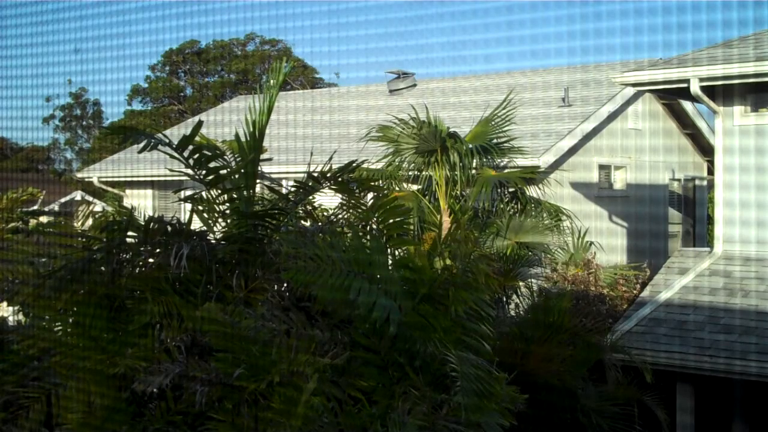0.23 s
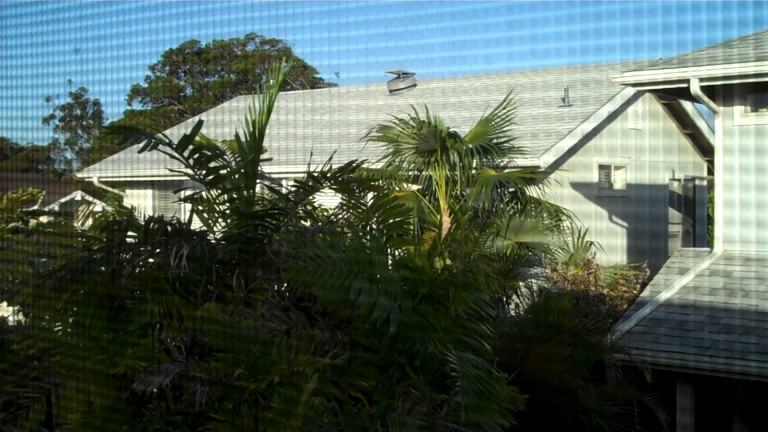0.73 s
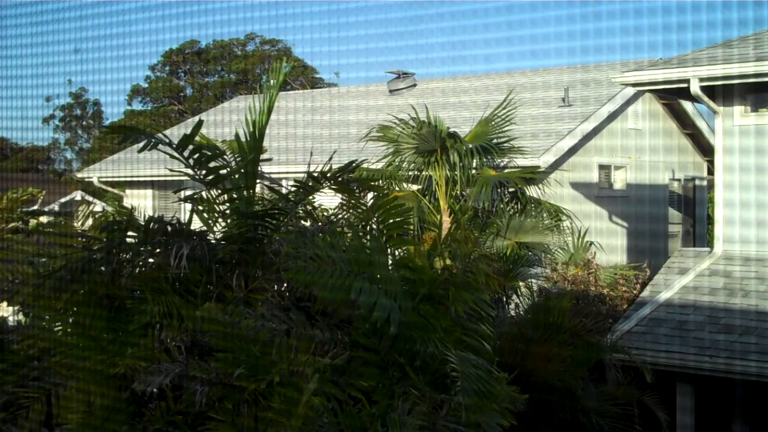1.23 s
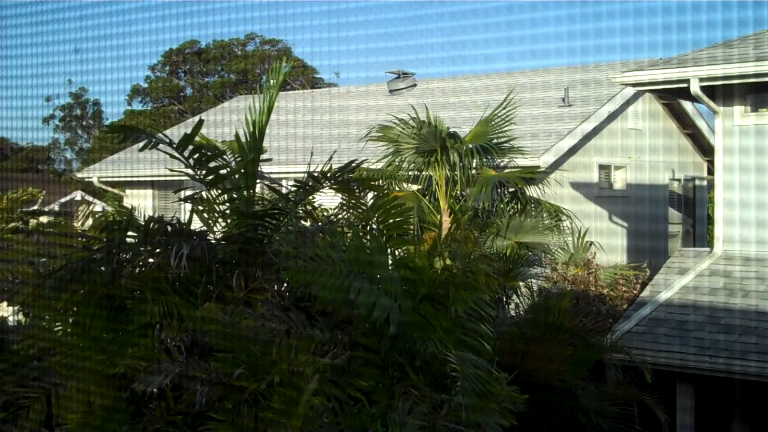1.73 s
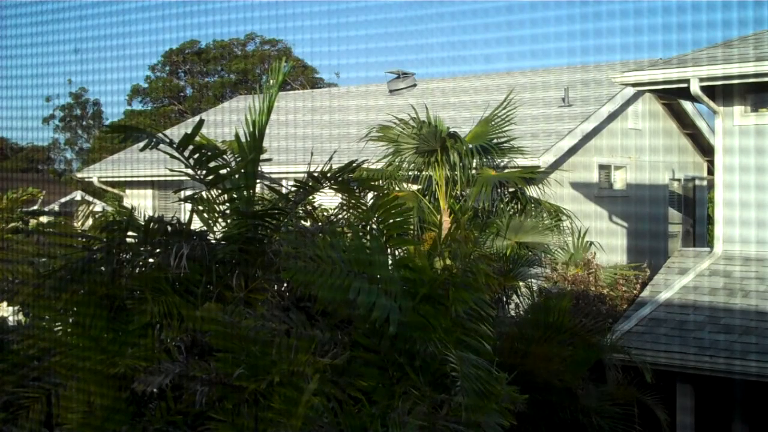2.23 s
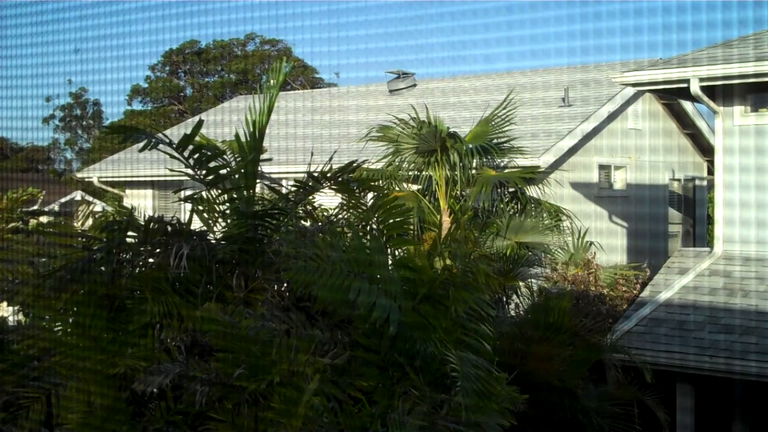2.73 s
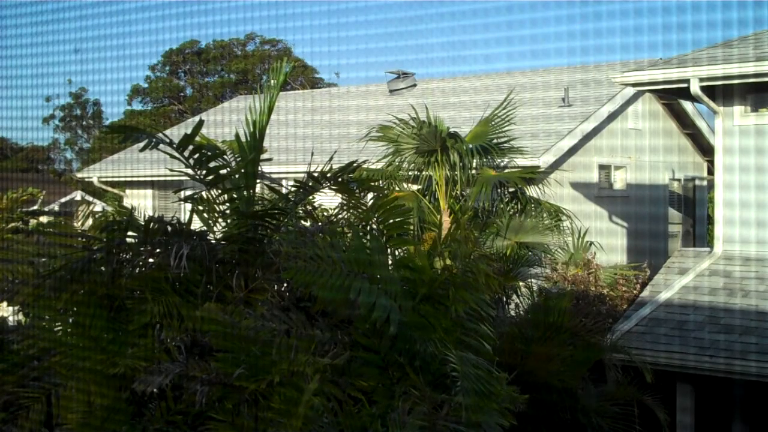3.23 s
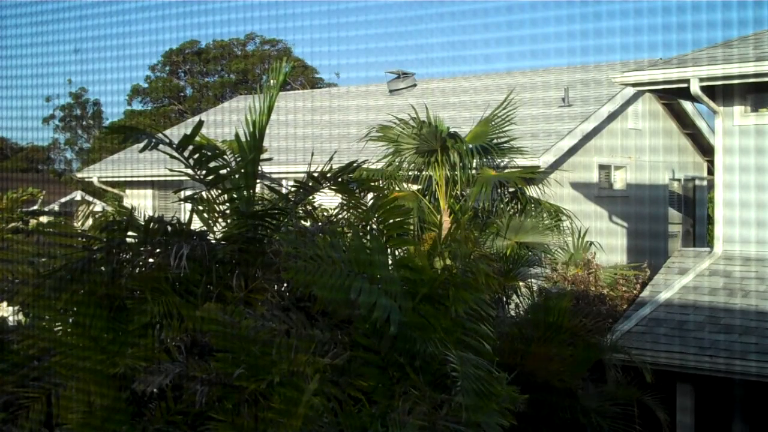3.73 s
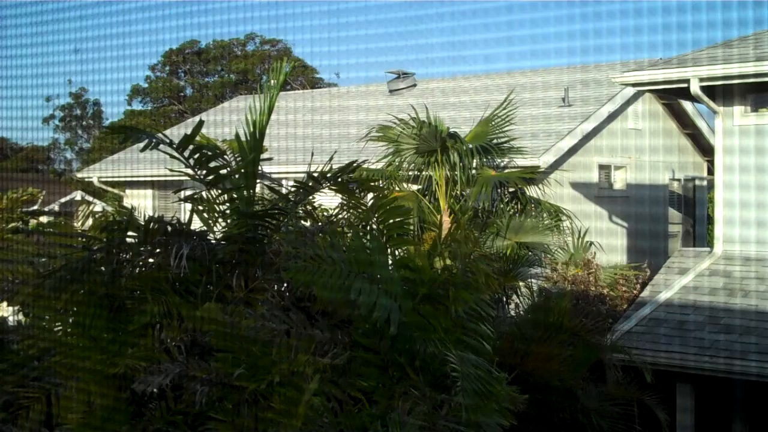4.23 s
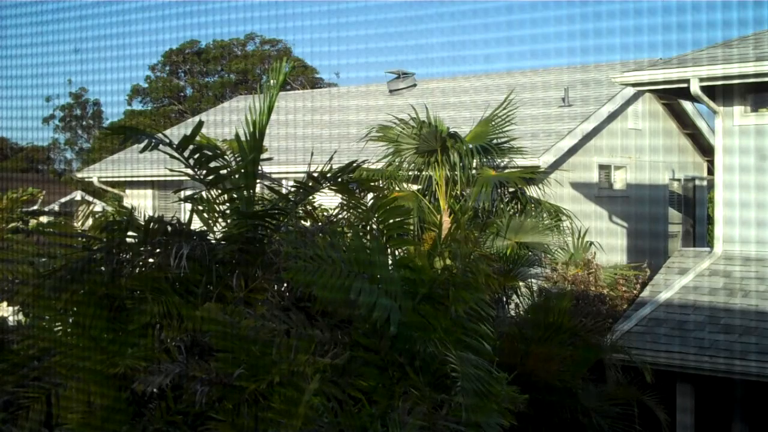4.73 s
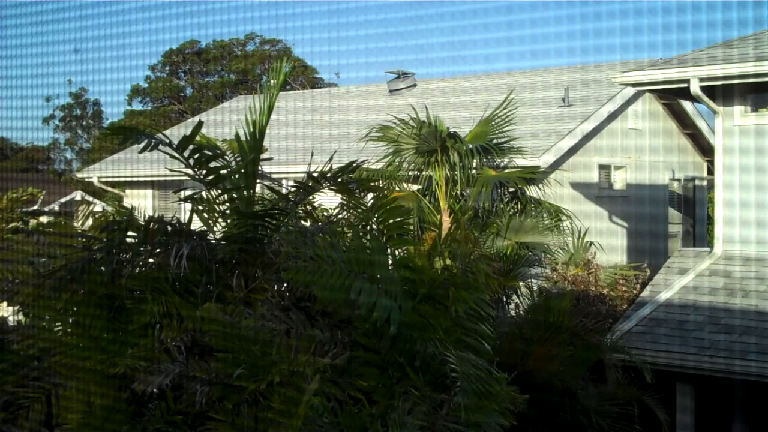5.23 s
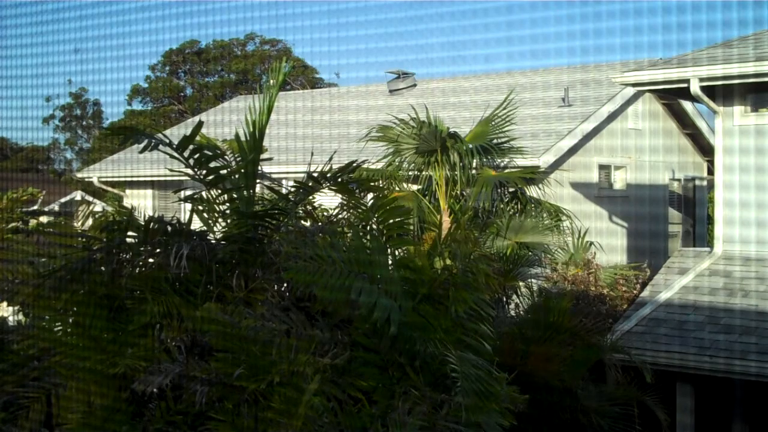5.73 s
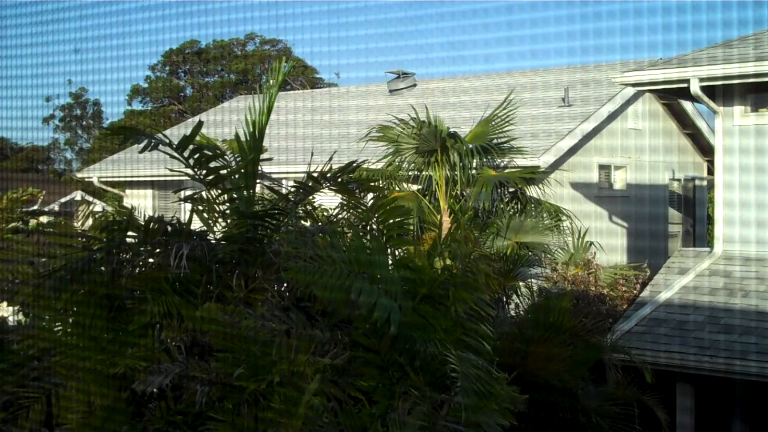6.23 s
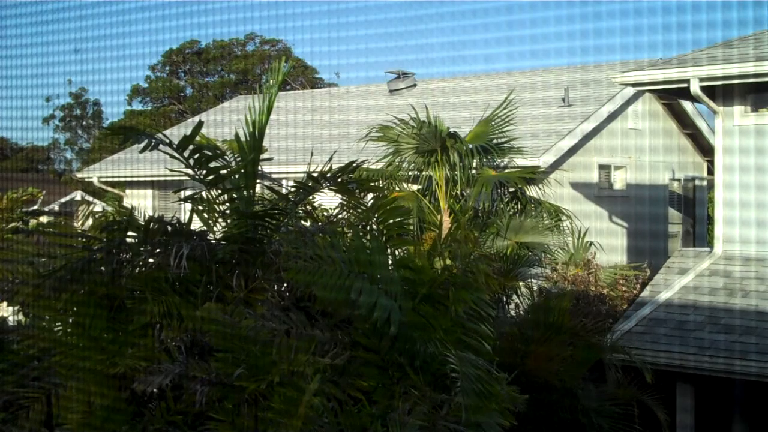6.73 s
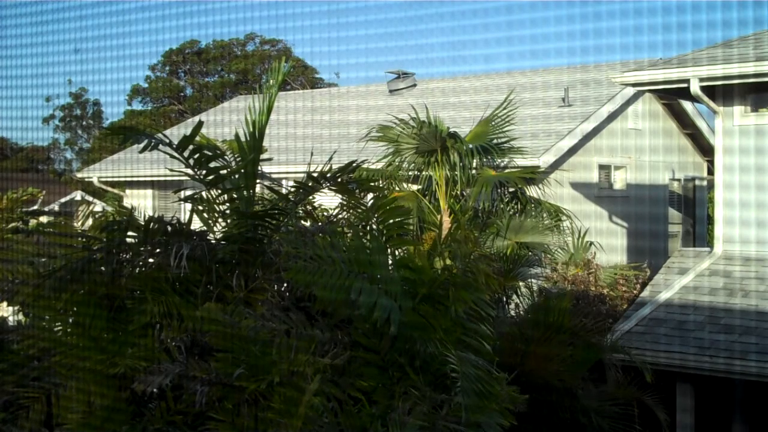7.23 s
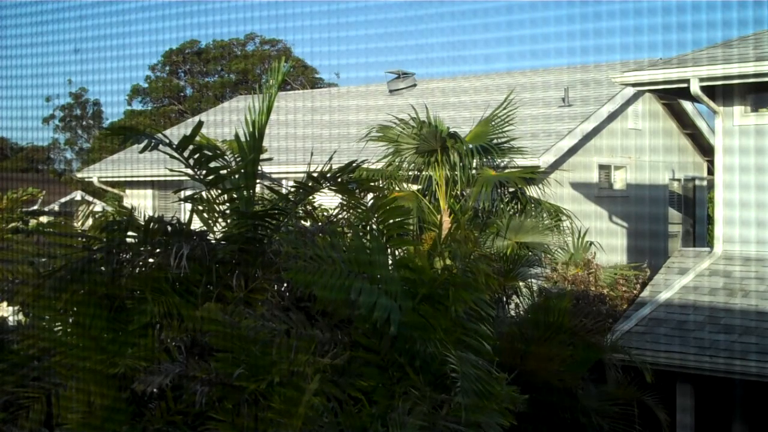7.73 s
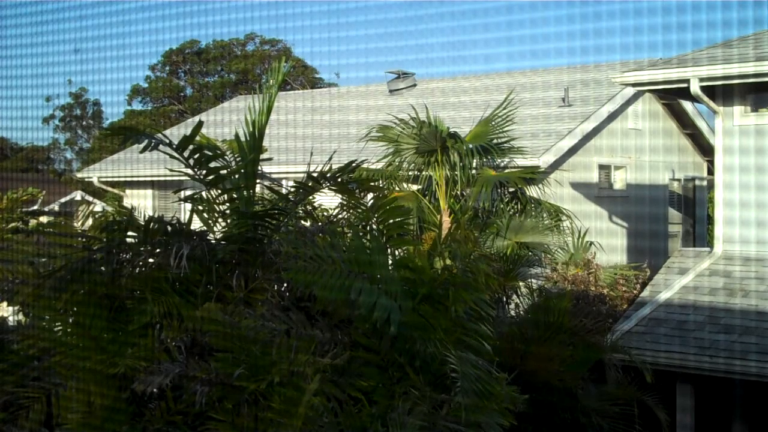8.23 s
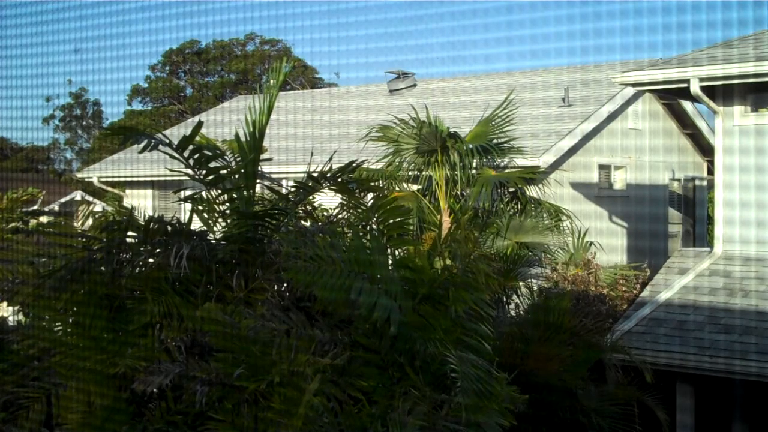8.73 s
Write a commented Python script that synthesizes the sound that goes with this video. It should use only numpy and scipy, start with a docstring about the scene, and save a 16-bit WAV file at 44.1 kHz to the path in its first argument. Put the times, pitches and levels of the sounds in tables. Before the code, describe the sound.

Faint bird chirps and a quiet spraying hiss in a neighborhood, broken by a single loud, echoing parrot squawk.

```python
"""Parrot squawk among houses.

A large parrot squawks once, its vibrating membranes rough when slack, smoother when taut; near walls
throw the call back and the yards ring on. Small birds whistle and far parrots rasp over a town hum
and a hiss like spraying water, which drops out for half a second and returns with a thin rising whine."""
import sys
import numpy as np
from scipy import signal
from scipy.fft import rfft, irfft
from scipy.io import wavfile
from scipy.ndimage import uniform_filter1d

SR = 44100
rng = np.random.default_rng(int(sys.argv[2]) if len(sys.argv) > 2 else 0)


def transcribe(u):
    """Save the signal u as a 16-bit wav file named by the first command-line argument.

    u: samples, shape (n,) or (channels, n), limited to [-1, 1]; the rate is SR.
    q: integer samples, one column per channel.
    """
    v = np.clip(np.atleast_2d(u).T, -1, 1)
    q = np.round(v * 32767).astype(np.int16)
    wavfile.write(sys.argv[1], SR, q)


N = 395577
TIME_S = np.arange(N) / SR
SIDE_LAG_S = .000135


def gain_of(db):
    """Decibels to amplitude factor."""
    return 10 ** (np.asarray(db) / 20)


def unit_rms(x):
    """Scales to rms 1."""
    return x / np.sqrt(np.mean(np.abs(x) ** 2) + 1e-20)


def at_hz(points, hz):
    """Interpolates on a log-frequency axis."""
    points_hz, values = np.transpose(points)
    return np.interp(np.log(hz + 1), np.log(points_hz + 1), values)


def follow(rows, t=TIME_S):
    """Interpolates each value column over time."""
    times_s, *columns = np.transpose(rows)
    return [np.interp(t, times_s, column) for column in columns]


def add(mix, start_s, sound):
    """Mixes a sound in at start_s."""
    part = mix[round(start_s * SR):][:len(sound)]
    part += sound[:len(part)]


def delay_left(x, lag_s):
    """Mono to stereo, left channel late."""
    return np.array([np.roll(x, round(lag_s * SR)), x])


def tilt(x, balance):
    """Splits a left-over-right spectrum between the channels."""
    left_db = at_hz(balance, np.fft.rfftfreq(N, 1 / SR))
    return irfft(rfft(x) * gain_of([[.5], [-.5]] * left_db), N)


def wobble(count, width_hz):
    """Complex low-pass noise, rms 1."""
    pole = np.exp(-np.pi * width_hz / SR)
    noise = rng.standard_normal(count + 4000) + 1j * rng.standard_normal(count + 4000)
    return unit_rms(signal.lfilter([1], [1, -2 * pole, pole * pole], noise)[-count:])


def noise_band(t, centre_hz, width_hz):
    """Narrow noise around a fixed pitch."""
    return (wobble(len(t), width_hz) * np.exp(2j * np.pi * centre_hz * t)).real


def stereo_noise(spectrum, coherence, lag_s, patch_db):
    """Coloured, partly coherent noise with drifting spectral patches."""
    frames, hz = N // 256 + 5, np.fft.rfftfreq(1024, 1 / SR)
    a, b, c, d, patches = rng.standard_normal((frames, 513, 5)).T
    patches = unit_rms(uniform_filter1d(uniform_filter1d(patches, size=12, axis=0), size=20, axis=1))
    shared = np.clip(coherence(hz), 0, 1)[:, None]
    delay = np.exp(-2j * np.pi * hz * lag_s)[:, None]
    right = a + 1j * b
    left = shared * delay * right + np.sqrt(1 - shared ** 2) * (c + 1j * d)
    spectra = np.array([left, right]) * gain_of(at_hz(spectrum, hz)[:, None] + patch_db * patches)
    return unit_rms(signal.istft(spectra, nperseg=1024, noverlap=768)[1][:, :N])


def fuzzy_tone(rows, width_hz):
    """Flickering narrow noise along rows of (time [s], pitch [Hz], level [dB])."""
    hz, db = follow(rows)
    gate = uniform_filter1d(1. * ((TIME_S > rows[0][0]) & (TIME_S < rows[-1][0])), size=1500)
    flicker = unit_rms(gain_of(3 * wobble(N, 12).real))
    carrier = np.exp(2j * np.pi * np.cumsum(hz) / SR)
    return gate * gain_of(db) * flicker * (wobble(N, width_hz) * carrier).real


def bird_note(length_s, path_hz, width_hz, steady, attack_share):
    """A tone bending through path_hz, part steady, part smeared over width_hz."""
    progress = np.linspace(0, 1, round(length_s * SR))
    curve = np.polyfit(np.linspace(0, 1, len(path_hz)), path_hz, len(path_hz) - 1)
    hz = np.polyval(curve, progress)
    envelope = np.minimum(progress / attack_share, 1) * np.sqrt(1 - progress)
    carrier = np.exp(2j * np.pi * np.cumsum(hz) / SR)
    return unit_rms(envelope * ((steady + wobble(len(hz), width_hz)) * carrier).real)


TRAFFIC_SPECTRUM = [(15, -46.5), (25, -14.5), (126, -5.5), (198, -9.5), (417, -4), (621, -4.5), (690, -6.5),
                    (788, -5.5), (949, -6), (1080, -8), (1800, -12), (3580, -12.5), (4800, -18),
                    (7330, -17), (14200, -22.5)]  # (frequency [Hz], relative density [dB])
TRAFFIC_LEVEL = [(0.0, -57), (2.33, -59), (3.3, -57.5), (5.16, -59), (6.84, -58.5), (8.97, -59)]  # (time [s], level [dB])
TRAFFIC_COHERENCE = [(50, .15), (130, .7), (280, .62), (620, .62), (1340, .45), (2920, .12), (6340, .03)]  # (frequency [Hz], left-right coherence [0-1])
# Far tones: (time [s], length [s], start pitch [Hz], end pitch [Hz], level [dB])
DRONE_TONES = [(0, 0.71, 1059, 1040, -63), (5.15, 1.2, 1190, 1032, -67), (6.55, 0.88, 1110, 1020, -67.5),
               (7.549, 0.8, 1160, 1108, -68)]


def town():
    """Far traffic, a low machine hum and faint sagging drones."""
    hum = gain_of(-73) * noise_band(TIME_S, centre_hz=121, width_hz=18)
    traffic = stereo_noise(TRAFFIC_SPECTRUM, lambda hz: at_hz(TRAFFIC_COHERENCE, hz),
                           lag_s=.00002, patch_db=.13)
    drones = sum(fuzzy_tone([(start_s, start_hz, db), (start_s + length_s, end_hz, db)], width_hz=77)
                 for start_s, length_s, start_hz, end_hz, db in DRONE_TONES)
    return gain_of(follow(TRAFFIC_LEVEL)[0]) * traffic + hum + drones


SPRAY_SPECTRUM = [(1470, -36), (2500, -14), (2650, -9.5), (3790, -12.5), (5330, -7.5), (5730, -8),
                  (5990, -7), (7450, -3), (9470, -16), (13500, -18.5), (14200, -24)]  # (frequency [Hz], relative density [dB])
SPRAY_LEVEL = [(0.0, -62), (0.17, -56), (2.0, -58), (2.62, -55.5), (4.4, -57.5), (6.9, -59), (7.6, -55),
               (8.97, -57.5)]  # (time [s], level [dB])


def spray():
    """A surging hiss from one side that drops while its valve is shut."""
    stop_s, restart_s, valve_s, shut_db = 1.363, 1.85, .03, -17
    surge_db, surges_per_s = 1.1, 2.93
    shut = follow([(stop_s - valve_s / 2, 0), (stop_s + valve_s / 2, 1),
                   (restart_s - valve_s / 2, 1), (restart_s + valve_s / 2, 0)])[0]
    surge = unit_rms(np.interp(TIME_S * surges_per_s, np.arange(60), rng.standard_normal(60)))
    gain = gain_of(follow(SPRAY_LEVEL)[0] + shut_db * shut + surge_db * surge)
    return gain * stereo_noise(SPRAY_SPECTRUM, lambda hz: np.full_like(hz, .45), SIDE_LAG_S, patch_db=.9)


def whine():
    """A thin tone that climbs and levels off after the spray restarts."""
    start_s, end_s, climb_s = 2.03, 3.14, .25
    start_hz, top_hz, level_db = 5100, 5400, -59.5
    rows = [(s, top_hz - (top_hz - start_hz) * np.exp(-(s - start_s) / climb_s), level_db)
            for s in np.linspace(start_s, end_s, 12)]
    return delay_left(fuzzy_tone(rows, width_hz=110), SIDE_LAG_S / 2)


FAR_RASPS = [(2.644, 0.04, 2080, -60), (3.184, 0.031, 3560, -69), (3.407, 0.045, 1600, -65),
             (3.408, 0.041, 2460, -62.5), (3.51, 0.053, 2220, -55.5), (6.803, 0.082, 2516, -63),
             (6.916, 0.092, 2800, -61.5), (7.361, .15, 3250, -69), (8.42, 0.066, 2634, -65.5)]  # (time [s], nominal length [s], pitch [Hz], relative level [dB])
FAR_CHIPS = [(1.288, 5400, -61.5), (1.977, 4780, -63), (4.61, 4900, -61.5), (5.548, 5030, -60.5),
             (6.433, 4870, -60.5), (7.427, 4400, -63), (8.366, 4820, -65.5)]  # (time [s], pitch [Hz], relative level [dB])


def far_birds():
    """Hoarse, barely pitched calls: sagging parrot rasps and one bird's short chips."""
    sag_share, spread_share, chip_spread_hz = .06, .13, 400
    out = np.zeros(N)
    for start_s, length_s, hz, db in FAR_RASPS:
        path_hz = [hz * (1 + sag_share), hz * (1 - sag_share)]
        rasp = bird_note(1.4 * length_s, path_hz, 2 * spread_share * hz, steady=.11, attack_share=.299)
        add(out, start_s, gain_of(db) * rasp)
    for start_s, hz, db in FAR_CHIPS:
        chip = bird_note(1.1 * .052, [hz, hz], 2 * chip_spread_hz, steady=.11, attack_share=.31)
        add(out, start_s, gain_of(db) * chip)
    return out


# Clear notes: (time [s], length [s], mid pitch [Hz], glide [Hz], level [dB])
BIRD_WHISTLES = [(0.51, 0.1, 3170, -110, -65), (0.623, 0.041, 2440, -130, -64.5),
                 (0.681, 0.09, 3300, 180, -63.5), (0.88, 0.058, 4500, 972, -61.5),
                 (1.23, 0.082, 3600, -750, -64), (1.498, 0.048, 4030, 120, -62.5),
                 (1.606, 0.035, 3620, -490, -66.5), (1.753, 0.064, 3760, -350, -63.5),
                 (1.793, 0.17, 2150, 200, -69.5), (2.133, 0.073, 3850, 300, -63),
                 (2.278, 0.13, 1800, -150, -69.5), (2.372, 0.086, 3750, -340, -63),
                 (2.806, 0.079, 3030, -130, -68), (2.857, 0.056, 3430, -70, -63),
                 (2.947, 0.044, 3970, 130, -61), (3.06, 0.074, 3560, -170, -64.5),
                 (3.24, 0.089, 2920, -210, -66.5), (3.574, 0.045, 4800, 396, -59),
                 (4.591, 0.031, 3950, -810, -61), (4.694, 0.066, 2505, -29, -65.5),
                 (6.32, 0.22, 3220, -170, -66.5), (6.435, 0.066, 2520, -135, -69),
                 (6.621, 0.043, 2500, -140, -68), (6.9, 0.3, 1990, 0, -68.5),
                 (7.103, 0.04, 4060, 200, -62.5), (7.23, 0.064, 3870, -38, -62),
                 (7.746, 0.067, 3950, 660, -61), (7.84, 0.041, 3425, -870, -62),
                 (7.984, 0.048, 4120, 220, -60.5), (8.099, 0.068, 3620, -20, -66),
                 (8.346, 0.075, 3820, 440, -61), (8.547, 0.033, 4600, 118, -64),
                 (8.625, 0.087, 2054, 205.5, -63), (8.672, 0.067, 3930, 301, -61.5),
                 (8.747, 0.078, 2100, -75, -67), (8.925, 0.038, 3750, -930, -64)]


def small_birds():
    """Short scratchy whistles arching in pitch, plus faint ones at random."""
    faint_count, faint_s, faint_hz, faint_db = 14, .05, (2400, 4200), -72
    faint = [(when * (N / SR - 1), faint_s, np.interp(pitch, [0, 1], faint_hz), 400 * (bend - .5),
              faint_db) for when, pitch, bend in rng.random((faint_count, 3))]
    out = np.zeros(N)
    for start_s, length_s, hz, glide_hz, db in BIRD_WHISTLES + faint:
        arch_share = .1 if hz > 3500 else .03
        ends_hz = hz * (1 - arch_share)
        path_hz = [ends_hz - glide_hz / 2, hz, ends_hz + glide_hz / 2]
        note = bird_note(length_s, path_hz, width_hz=420, steady=.6, attack_share=.35)
        add(out, start_s, gain_of(db) * note)
    return out


YARD_DECAY = [(300, 0.13), (1000, 0.91), (2000, 0.69), (4000, 0.61), (5500, 0.6), (8000, 0.53)]  # (frequency [Hz], T60 [s])


def yards(x):
    """Reverberation: sparse random reflections, coherent in the bass, decaying per band."""
    taps = np.zeros((2, SR))
    arrivals = np.arange(900, SR - 20, 20) + rng.integers(0, 20, (2, (SR - 901) // 20))
    np.put_along_axis(taps, arrivals, rng.choice([-1., 1.], arrivals.shape), 1)
    hz, t, spectra = signal.stft(taps, SR, nperseg=256)
    shared = 1 / (1 + (hz[:, None] / 2000) ** 2)
    spectra[1] = shared * spectra[0] + np.sqrt(1 - shared ** 2) * spectra[1]
    decay = gain_of(-60 * t / at_hz(YARD_DECAY, hz)[:, None])
    tail = signal.istft(spectra * decay, SR, nperseg=256)[1]
    return signal.fftconvolve(x[None], tail / np.linalg.norm(tail[0]), axes=1)[:, :N]


WALL_ECHOES = [(.011, -4, .00005), (.023, -4.5, -.00007), (.038, -7.5, .00007), (.055, -8, -.00005),
               (.075, -13.5, .00009)]  # (delay [s], relative level [dB], left lag [s])


def walls(x):
    """Single echoes off the nearest houses, alternating in sign."""
    taps = np.zeros((2, SR // 8))
    for k, (delay_s, db, lag_s) in enumerate(WALL_ECHOES):
        taps[[0, 1], [round((delay_s + lag_s) * SR), round(delay_s * SR)]] += (-1) ** k * gain_of(db)
    return signal.oaconvolve(x[None], taps, axes=1)[:, :N]


BREATH_SPECTRUM = [(250, -53.5), (600, -29.5), (1000, -13), (1800, -5), (2380, -11), (2900, -3.5),
                   (3900, -11), (4700, -23.5), (6800, -21), (8500, -35), (11000, -52)]  # (frequency [Hz], relative density [dB])


def breath(cycles):
    """Turbulent air in the throat, one puff per membrane cycle."""
    count = len(cycles)
    puffs = (.1 + np.exp(-(cycles % 1) / .26)) * rng.standard_normal(count)
    colour = gain_of(at_hz(BREATH_SPECTRUM, np.fft.rfftfreq(count, 1 / SR)))
    return unit_rms(irfft(rfft(puffs) * colour, count))


THROAT_RESPONSE = [(300, -50.5), (540, -28.5), (780, -2), (1060, -4), (1600, -3), (2100, 3.5),
                   (2380, -10.5), (2800, 3.5), (3250, -5), (4350, -10.5), (5100, -22.5), (6600, -20.5),
                   (7050, -13.5), (7600, -28), (11000, -49)]  # (frequency [Hz], gain [dB])


def membranes(cycles, hz, slack, roughness, beak_shift):
    """Harmonics shaped by the throat; uneven membranes smear the high ones, slack ones dull them."""
    subharmonic = .22 * (wobble(len(hz), 40) * np.exp(2j * np.pi * cycles / 3)).real
    dulling_db = -.8 * slack
    harmonics = 0
    for k in range(1, 20):
        flutter = 1 + (2.3 + .12 * k) * roughness * wobble(len(hz), 50 + 12 * k)
        shift = beak_shift if k < 9 else 1  # the beak moves only the lower resonances
        gain = gain_of(at_hz(THROAT_RESPONSE, k * hz / shift) + k * dulling_db)
        phase = 2 * np.pi * k * cycles + .4 * k * k
        harmonics += gain * (flutter * np.exp(1j * phase)).real
    return unit_rms(harmonics * (1 + subharmonic))


SQUAWK_CONTOUR = [(3.636, -57.5, 382.4), (3.654, -35, 413), (3.716, -19, 463.5), (3.751, -16, 505.7),
                  (3.78, -14.5, 529.8), (3.88, -12.5, 539.4), (3.985, -14.5, 532.3), (4.0, -17.5, 491.5),
                  (4.033, -35.5, 463.4), (4.088, -47, 402)]  # (time [s], effort [dB], pitch [Hz])
VOICE_CATCHES = [(3.762, 6.012, 0.0012), (3.81, 9.016, 0.0013), (3.84, 8, 0.0031), (3.893, 8.013, 0.0049),
                 (3.995, 5.983, 0.0037)]  # (time [s], dip [dB], half-width [s])


def parrot():
    """One arching squawk: the membranes tighten and grow smooth, then let go and rattle low."""
    taut_hz, release_s = 540.2, 3.985
    rough_taut, rough_rising, rough_released = .23, .56, .85
    start_s, end_s = SQUAWK_CONTOUR[0][0], SQUAWK_CONTOUR[-1][0]
    t = np.arange(start_s, end_s, 1 / SR)
    effort_db, hz = follow(SQUAWK_CONTOUR, t)
    for catch_s, dip_db, half_width_s in VOICE_CATCHES:
        effort_db -= dip_db * np.exp(-((t - catch_s) / half_width_s) ** 2)
    slack = np.clip((taut_hz - hz) / np.where(t < release_s, 130, 80), 0, 1)
    roughness = rough_taut + (np.where(t < release_s, rough_rising, rough_released) - rough_taut) * slack
    beak_shift = np.interp(t, [start_s, release_s, end_s], [.935, 1.047, .935])  # shut, open, shut
    waver = .004 * wobble(len(t), 25).real
    jitter = .17 * roughness ** 2 * wobble(len(t), 200).real
    cycles = np.cumsum(hz * (1 + waver + jitter)) / SR
    tone = np.sqrt(1 - roughness ** 2) * membranes(cycles, hz, slack, roughness, beak_shift)
    air = roughness * breath(cycles)
    rattle = .33 * roughness ** 3 * noise_band(t, centre_hz=550, width_hz=600) * (t > release_s)
    out = np.zeros(N)
    add(out, start_s, gain_of(effort_db) * (tone + air + rattle))
    low_cut = signal.butter(4, 300, "high", fs=SR, output="sos")  # the squawk carries nothing below about 300 Hz
    return signal.sosfilt(low_cut, out)


PARROT_BALANCE = [(500, -2), (1500, -2.5), (4000, 0.5), (8000, 2)]  # (frequency [Hz], left over right [dB])


def scene():
    """Birds and their echoes over town, spray and whine."""
    squawk, whistles, far = parrot(), small_birds(), far_birds()
    call = tilt(gain_of(-2) * squawk + gain_of(-6) * walls(squawk), PARROT_BALANCE)
    reverb = yards(gain_of(-11) * squawk + gain_of(-6) * whistles + far)
    birds = gain_of([[.8], [-.8]]) * delay_left(whistles, SIDE_LAG_S / 2) + gain_of(2.5) * far
    return call + gain_of([[-.6], [.6]]) * (birds + reverb) + town() + spray() + whine()


PORT_BALANCE = [(60, -3), (110, 0), (200, 2.0), (370, 2.5), (670, 0), (1230, 3.5), (2250, 2.5), (4120, 1),
                (7540, 4.5), (13800, 3)]  # (frequency [Hz], left over right [dB])


def record(dry):
    """Two microphone ports of unequal colour, then a low-pass."""
    cutoff_hz = 14200
    low_pass = signal.firwin(1023, cutoff_hz, window=("kaiser", 9), fs=SR)
    return signal.oaconvolve(tilt(dry, PORT_BALANCE), low_pass[None], "same", axes=1)


dry = scene()
out = record(dry)
transcribe(out)
```